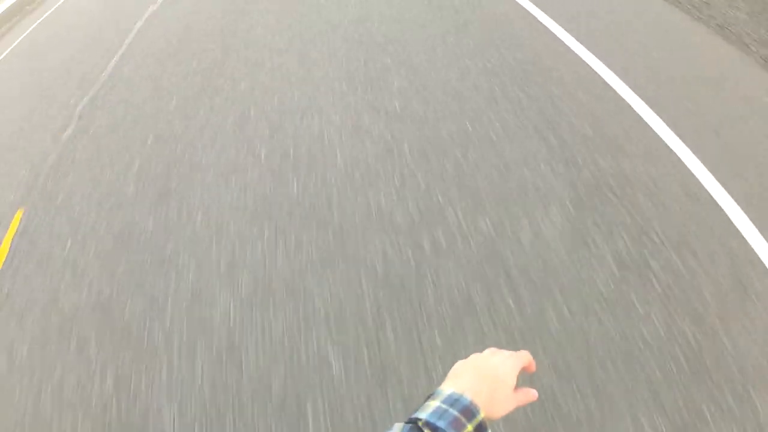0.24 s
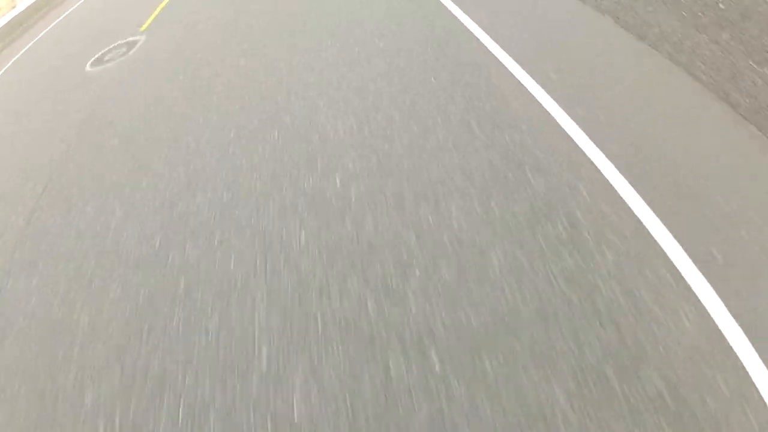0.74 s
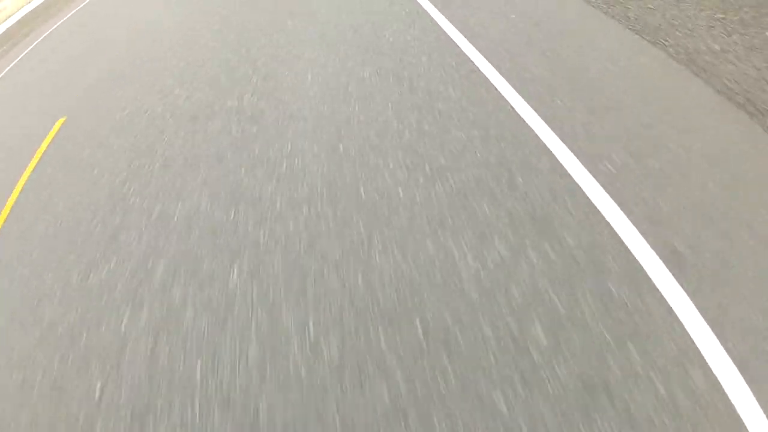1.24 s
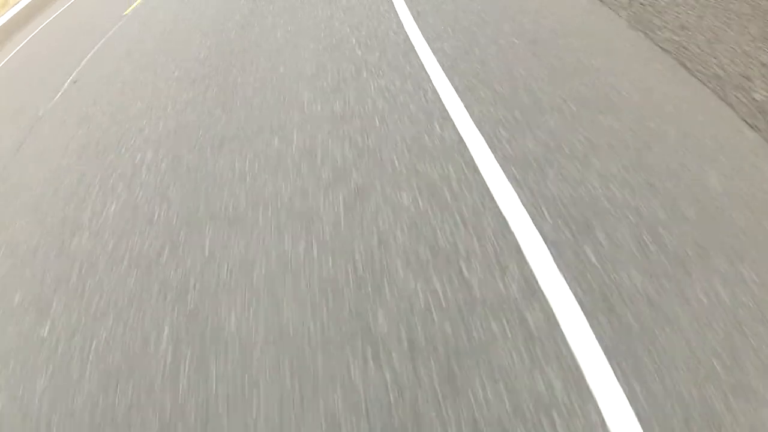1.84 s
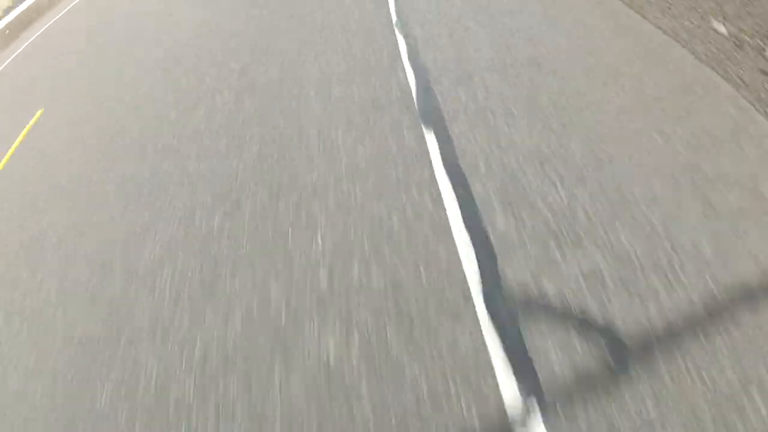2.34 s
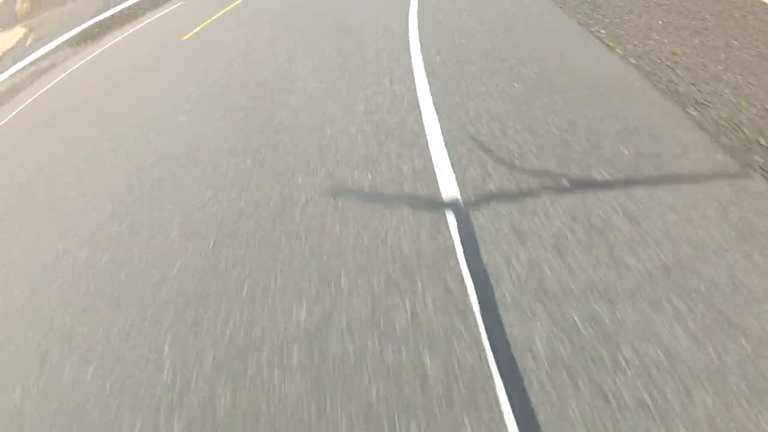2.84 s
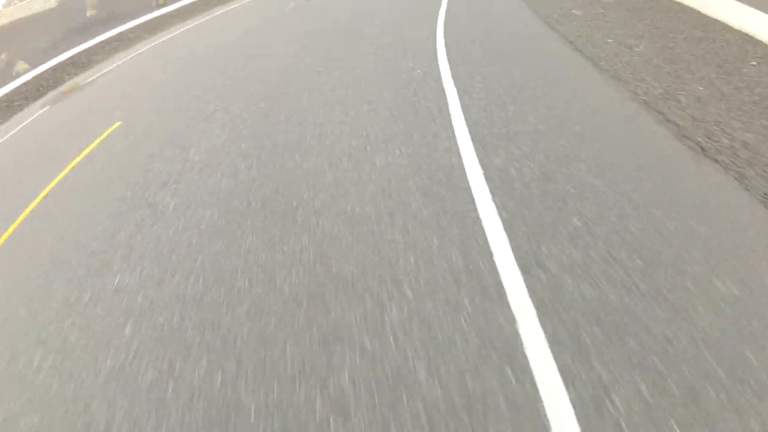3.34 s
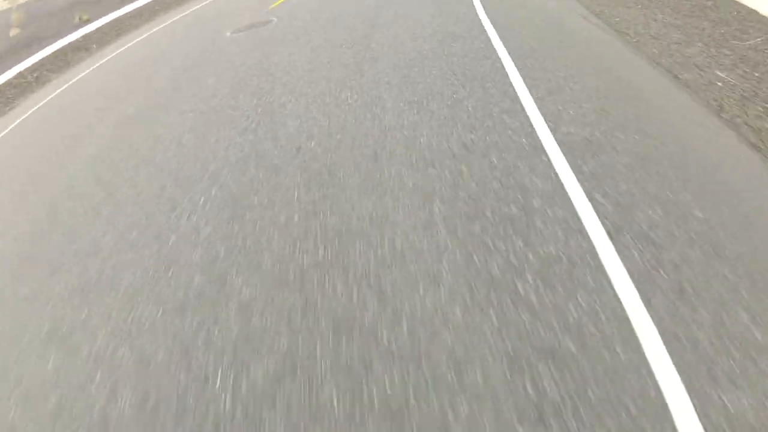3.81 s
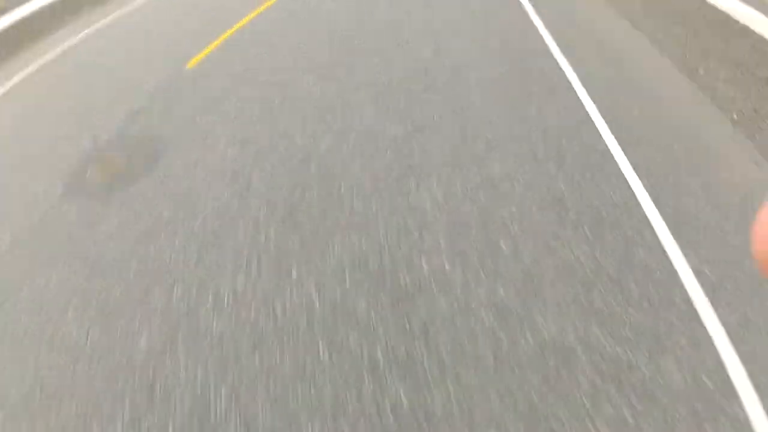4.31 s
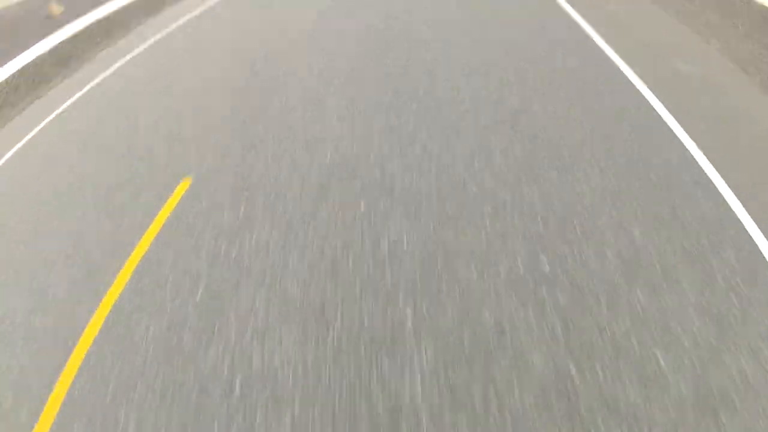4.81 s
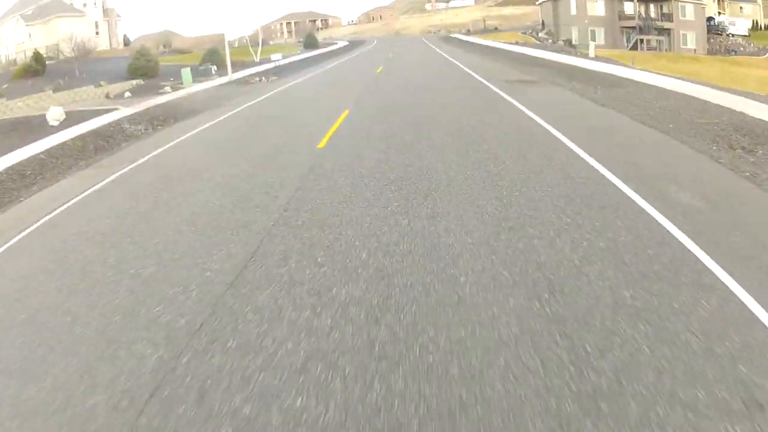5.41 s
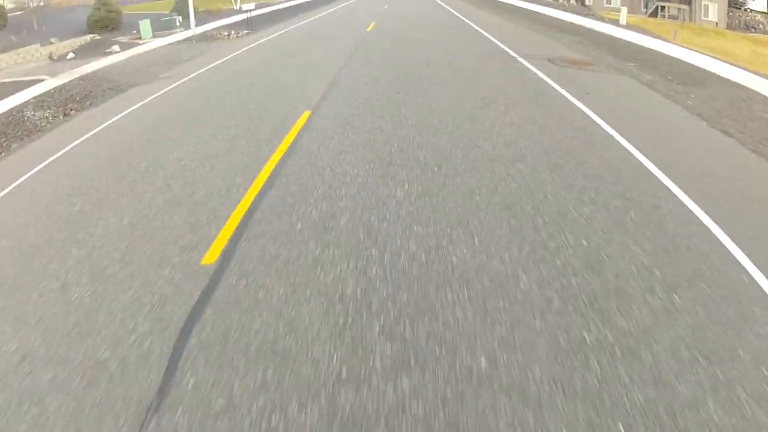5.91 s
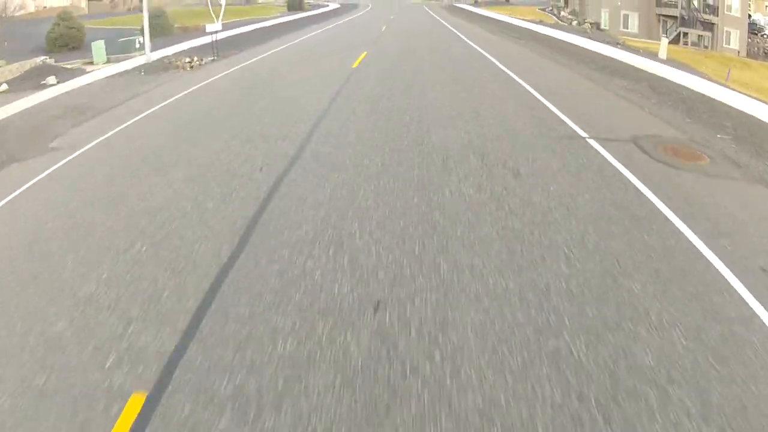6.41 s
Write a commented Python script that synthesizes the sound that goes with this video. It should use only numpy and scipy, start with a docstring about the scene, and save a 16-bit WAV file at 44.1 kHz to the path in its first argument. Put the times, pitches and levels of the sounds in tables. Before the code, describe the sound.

A longboard is already rolling fast on rough asphalt, heard close from a small handheld camera outdoors, dry and mono. The deck gives a deep, uneven, grainy drumming, strongest in the low mids, under a quieter gritty hiss; light wind flutters low beneath, with small gusts at 0.1 and 0.5 to 0.8 s. At 2.0 s a wheel scrubs sideways, a very short chattering hiss. Rolling swells slightly around 3 s. From 4.3 s fingers shift on the plastic housing: sharp clacks at 4.3, 4.6 and 4.7, then a dense cluster from 4.95 to 5.2. Wind gusts build with them, and from 5.2 to 5.8 a heavy buffeting roar crackles and overloads, ducking the sound, while the rolling dips near 5.2 and the hiss turns hollow. Last knocks fall at 5.6 to 5.8, the final one a deeper thud. The wind drops, a faint scrub passes at 6.2, and steady rumble with thin fizz continues until 6.6 s.

```python
"""A deep drumming under fine hiss: a longboard on rough asphalt, close to a small camera in the rider's hand.
Random stones and road grain excite the deck's spectrum; filtered noise makes the grit and brief wheel scrubs.
Later the grip shifts: noise bursts ring the camera housing, and shaped noise buffets the microphone as wind.
The recorder ducks peaks, clips, and holds each sample at a low rate, which adds a thin fizz."""
import sys
import numpy as np
from scipy import signal
from scipy.fft import rfft, irfft
from scipy.io import wavfile
from scipy.ndimage import uniform_filter1d

SR = 44100
rng = np.random.default_rng(int(sys.argv[2]) if len(sys.argv) > 2 else 0)


def unload_audio(sound):
    """Save the sound as a 16-bit wav file, at the path given as the first command line argument."""
    columns = np.transpose(np.atleast_2d(sound))
    # keep every value between -1 and 1, then stretch to whole-number steps
    steps = np.round(np.clip(columns, -1, 1) * 32767)
    wavfile.write(sys.argv[1], SR, steps.astype(np.int16))


N = 293706
TIME = np.arange(N) / SR  # seconds
HOLD_HZ = 12000  # rate at which the recorder takes and holds samples


def gain_of(db):
    """Decibels to amplitude."""
    return 10 ** (np.asarray(db) / 20)


def evened(x):
    """Scales to an rms of one."""
    return x / np.sqrt(np.mean(x ** 2) + 1e-20)


def curves(rows):
    """Each column of a table, after its times, as a curve over time."""
    s, *columns = np.transpose(rows)
    return [np.interp(TIME, s, column) for column in columns]


def colour(x, points):
    """Passes x through a causal, minimum-phase filter with the given spectrum."""
    f, db = np.transpose(points)
    hz = abs(np.fft.fftfreq(8192, 1 / SR))
    log_gain = np.log(gain_of(np.interp(np.log(hz + 1), np.log(f), db)))
    spectrum = np.exp(np.conj(signal.hilbert(log_gain)))
    response = np.fft.ifft(spectrum).real
    return signal.oaconvolve(x, response[:len(hz) // 2])[:len(x)]


def resonate(x, hz, width_hz):
    """A resonance of gain one whose centre may move: shift down to zero, smooth, shift back."""
    turn = np.exp(2j * np.pi * np.cumsum(hz * np.ones(len(x))) / SR)
    r = np.exp(-np.pi * width_hz / SR)
    smoothed = signal.lfilter([1 - r], [1, -r], x / turn)
    return 2 * (turn * smoothed).real


def resonate_twice(x, hz, width_hz):
    """Two equal resonances in a row, for steeper sides."""
    return resonate(resonate(x, hz, width_hz), hz, width_hz)


def wander(low_hz, high_hz):
    """Random unevenness between two rates, rms one."""
    hz = np.fft.rfftfreq(N, 1 / SR)
    band = (hz > low_hz) * (hz < high_hz)
    return evened(irfft(rfft(rng.standard_normal(N)) * band, N))


def add(mix, s, sound):
    """Adds a sound to the mix, in place, at time s."""
    part = mix[round(s * SR):][:len(sound)]
    part += sound[:len(part)]


def wheels(stones_per_s=270, fine_db=1.0, patchy_db=1.0, grit_patchy_db=1.15, drum_trim_db=0.5, hiss_trim_db=5.0):
    """Single stones and the fine grain of the road drum the deck; grit hisses under the wheels."""
    # Each row: time in seconds, drumming of the deck in dB, hiss of the grit in dB, both before their trims.
    roll_rows = [(0.1, -16.5, -44), (0.24, -16.5, -47.5), (0.6, -18.5, -49), (1.3, -18, -47),
                 (1.8, -17, -45.5), (2.45, -16, -44.5), (2.7, -16.5, -45), (3.05, -15.3, -44),
                 (3.45, -16, -46), (4.1, -19, -46.6), (4.35, -17, -43.5), (4.9, -19, -44),
                 (5.22, -25.5, -54), (5.55, -16, -44.5), (5.9, -19, -45.5), (6.35, -18.5, -48.8),
                 (6.6, -17.5, -45)]
    # Spectrum of the drumming deck. Each row: frequency in Hz, gain in dB.
    deck_spectrum = [(20, -17.5), (60, -19), (150, -15), (260, -7.5), (380, -2), (480, 0), (560, 1),
                     (620, -1.5), (690, -11), (770, -19), (900, -25.5), (1080, -46), (1600, -56.5),
                     (5500, -68.5)]
    # Spectrum of the hissing grit. Each row: frequency in Hz, gain in dB.
    grit_spectrum = [(300, -7.5), (800, 8.5), (1080, 0.5), (1400, 0), (1650, -8.5), (1950, -2.5),
                     (2250, -1), (2600, -2.5), (3000, -1), (3650, -6), (4300, -5.5), (5100, -7),
                     (5500, -15.5), (5800, -14.5)]
    drum_db, hiss_db = curves(roll_rows)
    stones = (rng.random(N) < stones_per_s / SR) * rng.choice([-1, 1], N)
    road = evened(stones) + gain_of(fine_db) * rng.standard_normal(N)
    coarse = wander(12, 100)  # coarser and smoother patches fly past
    drum = evened(colour(road * gain_of(patchy_db * coarse), deck_spectrum))
    grit = rng.standard_normal(N) * gain_of(grit_patchy_db * coarse)
    hiss = evened(colour(grit, grit_spectrum))
    return gain_of(drum_db + drum_trim_db) * drum + gain_of(hiss_db + hiss_trim_db) * cupped(hiss)


def cupped(hiss, hollow_db=5, width_hz=1500):
    """The hand shades the hiss, which then comes through the resonant hollow of the palm."""
    # The hand around the camera. Each row: time in seconds, share of the hiss covered (0-1), hollow's pitch in Hz.
    hand_rows = [(4.35, 0, 3100), (4.8, 0.22, 3200), (5.25, 0.8, 2700), (5.7, 0.3, 3000), (5.87, 0.4, 4860),
                 (5.93, 1, 3920), (6.02, 0, 3000)]
    cover, hz = curves(hand_rows)
    cover = np.clip(cover, 0, 1)
    hollow = gain_of(hollow_db) * resonate_twice(hiss, hz, width_hz)
    return (1 - cover) * hiss + cover * hollow


def scrub(hz=4400, width_hz=2400, chatter_db=4, squareness=1.6):
    """A wheel drifts sideways with a chattering hiss that swells and fades."""
    # Each row: middle in seconds, length in seconds, level at the middle in dB.
    scrub_rows = [(2.018, 0.13, -38), (6.218, .13, -48)]
    power = 0
    for s, length, db in scrub_rows:
        # a squareness of 2 is a bell; less is more pointed
        swell = np.exp(-abs(2 * (TIME - s) / length) ** squareness)
        power = power + gain_of(db) ** 2 * swell
    slips = rng.standard_normal(N) * gain_of(chatter_db * wander(28, 250))
    return np.sqrt(power) * evened(resonate_twice(slips, hz, width_hz))


def clacks(rise_s=0.001, fade_s=0.00062, tail_db=-24, tail_s=0.0033, width_hz=1100, grain_db=3):
    """Each slip of the grip rattles the plastic housing briefly: one wall rings and the case thuds."""
    # Fingers on the housing. Each row: start in seconds, level in dB, length of contact in seconds,
    # pitch of the wall that is hit in Hz, its ring in dB and the whole case's thud in dB, both against the rattle.
    clack_rows = [(4.306, -8, 0.0025, 1830, -1, -14), (4.401, -14, 0.0091, 1250, -13, -25),
                  (4.416, -20, 0.02, 4460, -16, -4.5), (4.5207, -19.5, 0.0041, 2930, -21, 0.5),
                  (4.5888, -11.5, 0.0026, 1320, -4, -23), (4.648, -25, 0.011, 2420, -6, 3),
                  (4.7247, 1.5, 0.0046, 2620, -4, -8.5), (4.819, -28, 0.0051, 2300, -6, -2),
                  (4.948, -9.5, 0.0043, 1960, 1, 6), (4.964, 0, 0.0023, 3000, -26, -5),
                  (4.9686, -1.5, 0.003, 3550, -10, -9), (5.0132, -5.5, 0.0027, 1720, -3, 1),
                  (5.042, -19.5, 0.0015, 2000, -14, -13), (5.071, -17.5, 0.0011, 3300, -3, -10),
                  (5.1035, -1.5, 0.0017, 3130, 6, -14), (5.1499, 3.5, 0.0019, 3860, -16, -2),
                  (5.201, -14, 0.0009, 2860, -8, -15), (5.2117, 4.5, 0.00093, 3140, 12, -33),
                  (5.3535, -17.5, 0.0011, 3000, -9, 13), (5.438, -14.5, 0.0018, 2960, -20, 12),
                  (5.6166, -12, 0.0012, 3680, -6, -9), (5.6923, -6.5, 0.0011, 3540, -24, 0.5),
                  (5.706, -12, 0.00087, 2870, 13, -6), (5.758, -26.5, 0.0099, 3700, -20, -2),
                  (5.7759, -11.5, 0.0034, 3770, -15, -11), (5.795, -3, 0.0037, 790, 14, 23)]
    # Spectrum of the rattling housing. Each row: frequency in Hz, gain in dB.
    housing_spectrum = [(150, -5), (700, -6.5), (1100, 3), (1500, -1.5), (2000, 3.5), (2450, -1.5),
                        (3100, 3.5), (4000, -4), (4900, -6.5), (5800, -13.5)]
    case_hz, case_width_hz = 843, 560  # low thud of the whole case
    out, t = np.zeros(N), np.arange(SR // 10) / SR
    for s, db, length, hz, ring_db, thud_db in clack_rows + faint_slips():
        after = np.maximum(t - length, 0)
        let_go = np.exp(-after / (fade_s + length / 5)) + gain_of(tail_db) * np.exp(-after / tail_s)
        contact = (1 - np.exp(-t / rise_s)) * let_go
        catches = evened(uniform_filter1d(rng.standard_normal(len(t)), size=40))  # skin sticks and lets go
        rattle = rng.standard_normal(len(t)) * contact * gain_of(grain_db * catches)
        wall = evened(resonate_twice(rattle, hz, width_hz))
        case = evened(resonate_twice(rattle, case_hz, case_width_hz))
        housing = evened(colour(rattle, housing_spectrum))
        clack = housing + gain_of(ring_db) * wall + gain_of(thud_db) * case
        add(out, s, gain_of(db) * evened(clack) * np.sqrt(np.mean(contact ** 2)))
    return out


def faint_slips(count=12):
    """Small slips of the fingers at random times during the handling, as rows like those of the clacks."""
    # One row: level in dB, length of contact in seconds, pitch in Hz, ring in dB, thud in dB.
    slip_row = (-30, 0.0015, 2300, -8, 0)
    # The stretch in which the fingers shift: start in seconds, end in seconds.
    handling_span = (3.7, 5.3)
    start, end = handling_span
    return [(start + when * (end - start), *slip_row) for when in rng.random(count)]


def wind(gust_db=1.77, overload_db=-36, overloads_per_s=180, swirl_db=-15.0, swirl_growth=0.66,
         roar_db=-3, roar_growth=1.89):
    """Eddies thump the microphone port: light air swirls deep; hard buffeting is brighter, with overload ticks."""
    # Four spectra: buffeting, the recorder's overload crackle, slow large eddies, small fast eddies.
    # In all of them, each row: frequency in Hz, gain in dB.
    buffet_spectrum = [(15, -27), (35, -16), (65, -1.5), (115, -1), (200, -4), (300, -10), (450, -17),
                       (700, -31), (1000, -43.5), (2000, -52), (3200, -67), (5500, -71)]
    overload_spectrum = [(300, -14), (1200, 4), (3000, -8.5), (5800, -19)]
    swirl_spectrum = [(15, -5.5), (40, -2.5), (70, 1), (130, -12.5), (300, -36), (1000, -76)]
    roar_spectrum = [(60, -24.5), (160, -2.5), (260, 0), (450, -9.5), (700, -21), (1000, -32), (2000, -42),
                     (3200, -51), (5500, -69)]
    level_db = airspeed_db()
    eddies = rng.standard_normal(N) * gain_of(gust_db * wander(10, 100))
    buffet = evened(colour(eddies, buffet_spectrum))
    # the recorder's overload crackle, drawn as random ticks that follow the air level
    ticks = (rng.random(N) < overloads_per_s / SR) * np.tanh(rng.standard_normal(N))
    overload = gain_of(overload_db) * evened(colour(ticks, overload_spectrum))
    swirl = evened(colour(rng.standard_normal(N), swirl_spectrum))
    roar = evened(colour(rng.standard_normal(N), roar_spectrum))
    # growth: dB that a layer gains for each dB of air level
    return (gain_of(level_db) * (buffet + overload)
            + gain_of(swirl_db + swirl_growth * level_db) * swirl
            + gain_of(roar_db + roar_growth * level_db) * roar)


def airspeed_db(rise_share=0.4, release_s=0.024):
    """Level of the air on the microphone: headwind plus gusts that build, hold and break off."""
    # Headwind on the microphone. Each row: time in seconds, level in dB.
    headwind_rows = [(0, -28.5), (1.0, -25.5), (1.5, -28.5), (2.45, -27), (3.2, -35), (4.0, -30.5),
                     (4.3, -35), (6.66, -34)]
    # Gusts on top of it. Each row: start in seconds, length in seconds, level in dB.
    gust_rows = [(0.112, 0.08, -20), (0.472, 0.36, -21.5), (4.382, 0.27, -14.5), (4.676, 0.036, -9),
                 (4.79, 0.23, -13.5), (4.888, 0.073, -9), (5.027, 0.033, -7), (5.072, 0.2, -10.5),
                 (5.171, 0.61, -4.5), (5.813, 0.14, -18), (6.32, 0.073, -25.5)]
    headwind_db, = curves(headwind_rows)
    power = gain_of(headwind_db) ** 2
    for s, length, db in gust_rows:
        rise = np.clip((TIME - s) / (rise_share * length), 0, 1)
        release = np.exp(-np.maximum(TIME - s - length, 0) / release_s)
        power = power + (gain_of(db) * rise * release) ** 2
    return 10 * np.log10(power)


def scene():
    """Everything is close and outdoors: no echo."""
    return (wheels() + scrub() + clacks() + wind())[None]


def duck(x, recover_db_per_s=85, attack_s=0.00039):
    """Peak limiter: drops quickly when the sound passes full scale, and creeps back."""
    peak_db = 20 * np.log10(abs(x) + 1e-9)
    fall = np.arange(len(x)) / HOLD_HZ * recover_db_per_s
    over_db = np.maximum(np.maximum.accumulate(peak_db + fall) - fall, 0)
    lag = np.exp(-1 / (attack_s * HOLD_HZ))
    return x / gain_of(signal.lfilter([1 - lag], [1, -lag], over_db))


def record(dry):
    """Coarse sampling, limiter and clipping; held samples mirror the rumble as a thin fizz around the hold rate."""
    coarse = signal.resample_poly(dry[0], HOLD_HZ, SR)
    coarse = signal.oaconvolve(coarse, signal.firwin(41, 5800, fs=HOLD_HZ), "same")
    held = np.repeat(np.clip(duck(coarse), -1, 1), 4)
    sound = signal.resample_poly(held, SR, 4 * HOLD_HZ)[:N]
    top_edge = signal.firwin(301, 15300, window=("kaiser", 9), fs=SR)  # low-pass, edge in Hz
    return signal.oaconvolve(sound, top_edge, "same")[None]


dry = scene()
out = record(dry)
unload_audio(out)
```